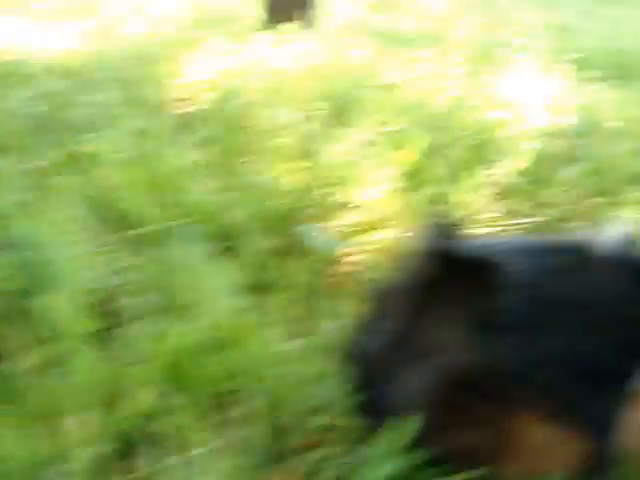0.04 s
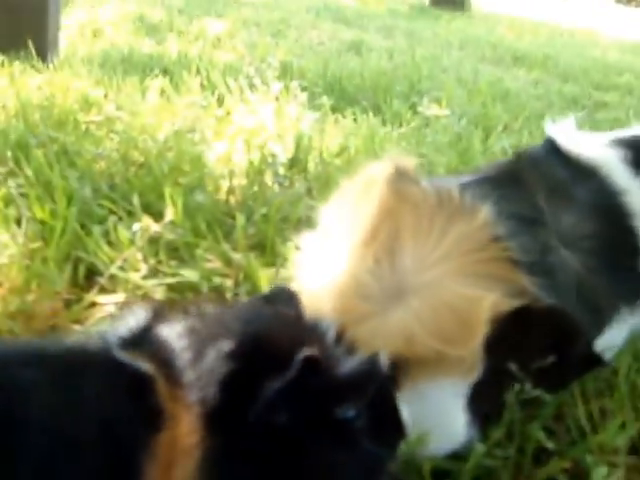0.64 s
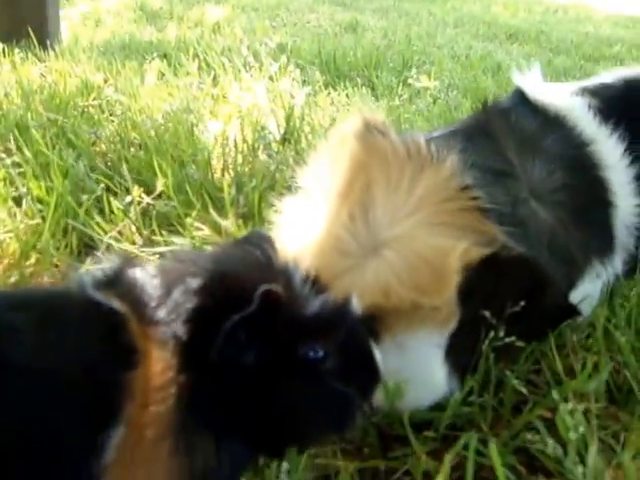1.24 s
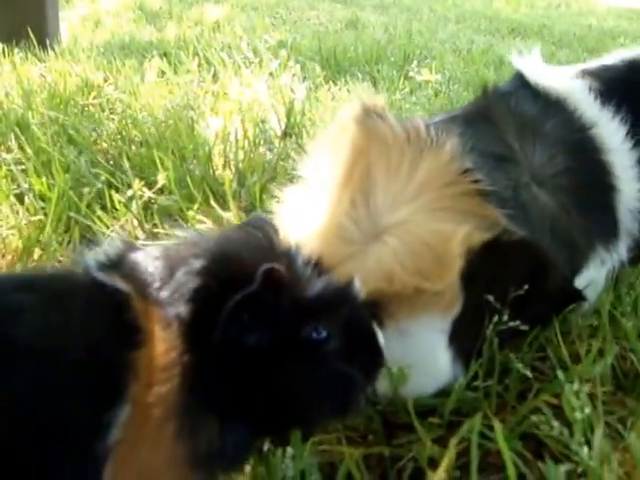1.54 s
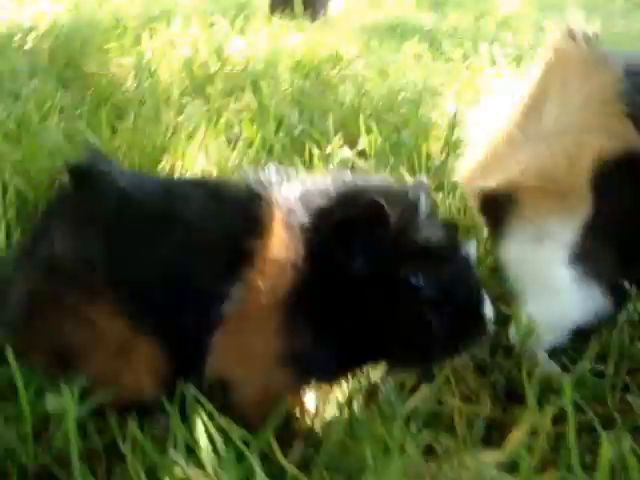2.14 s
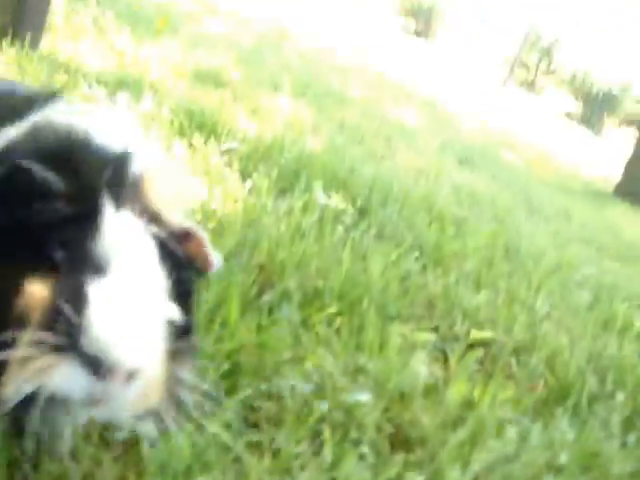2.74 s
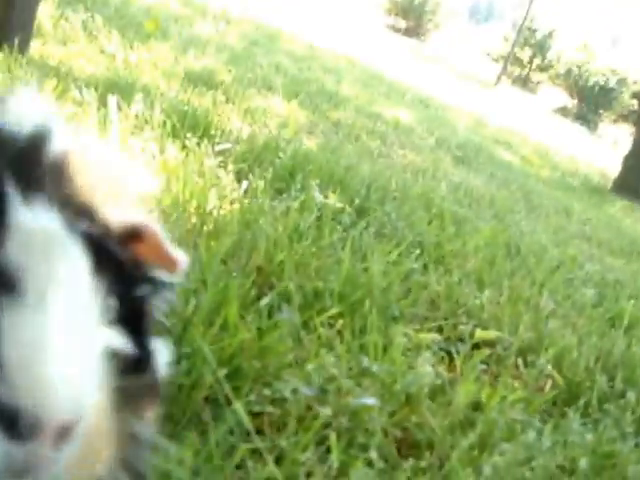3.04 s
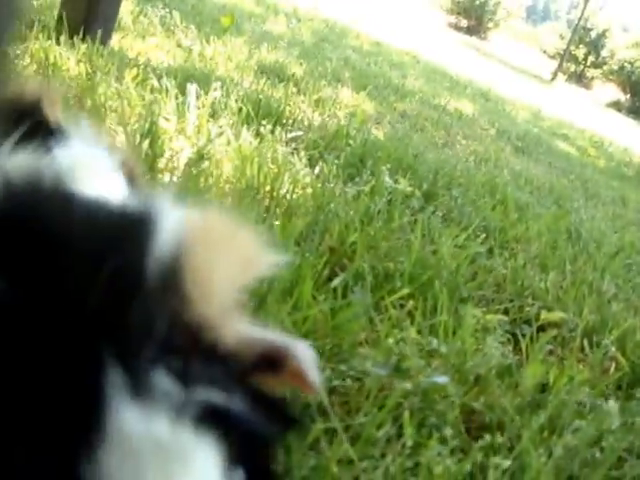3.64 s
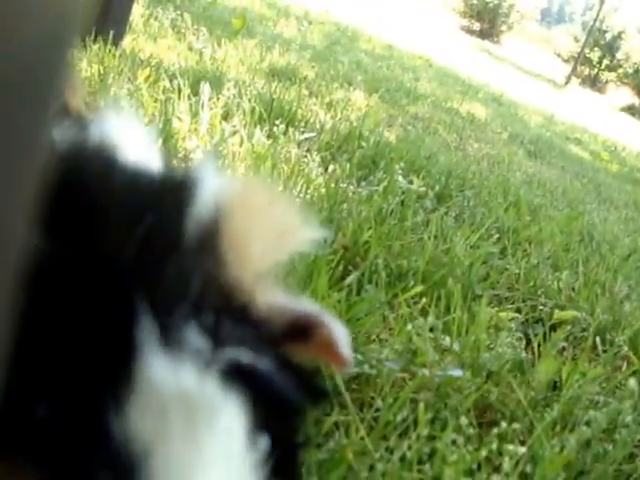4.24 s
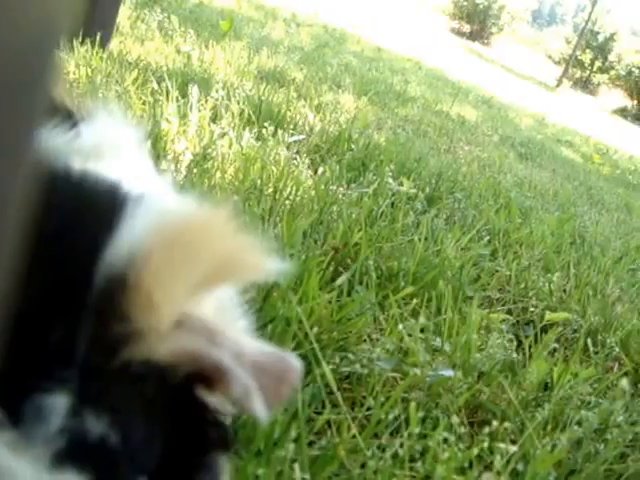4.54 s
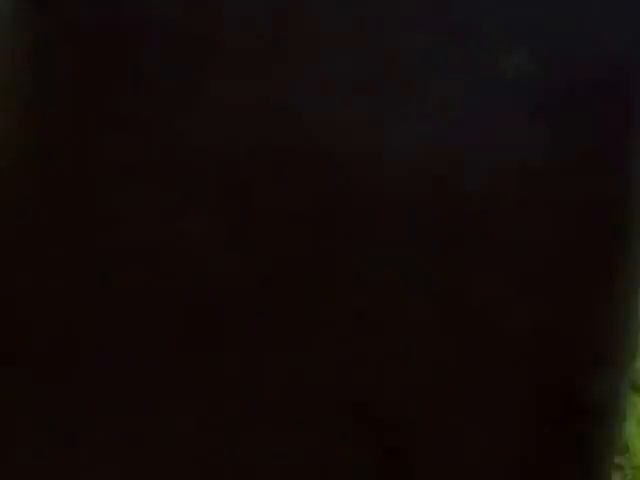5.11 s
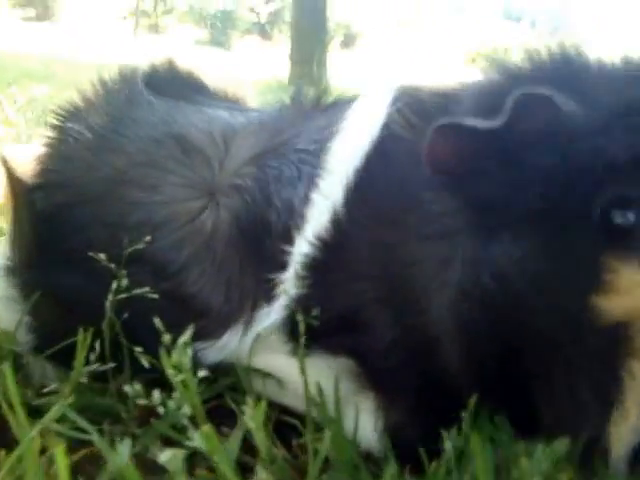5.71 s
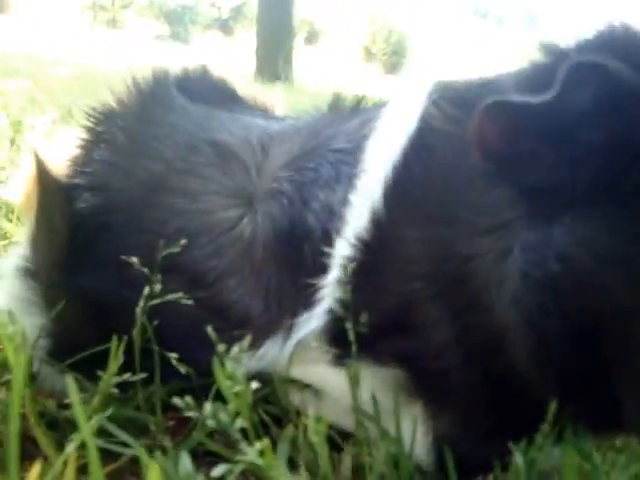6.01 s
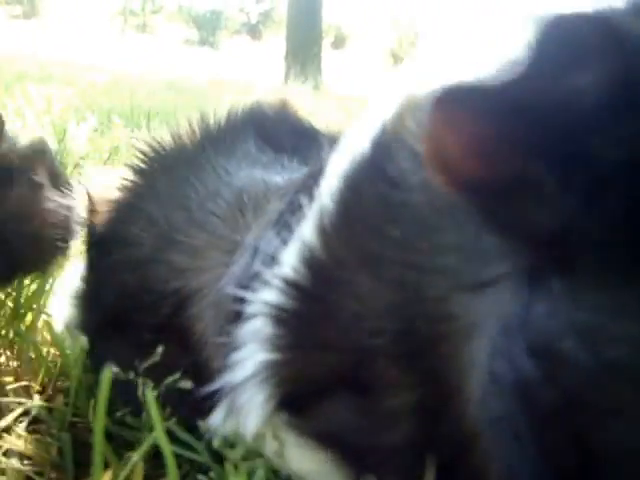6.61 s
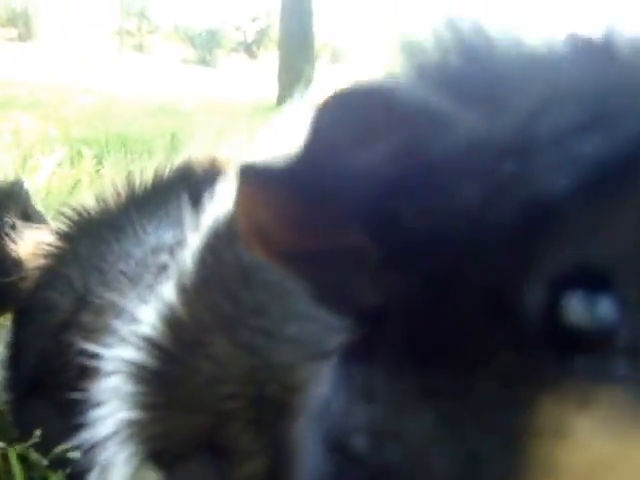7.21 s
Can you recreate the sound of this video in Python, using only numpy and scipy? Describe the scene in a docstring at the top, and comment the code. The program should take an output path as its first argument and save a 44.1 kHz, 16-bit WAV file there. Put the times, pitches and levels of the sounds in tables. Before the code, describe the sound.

Faint ticks and snaps of guinea pigs grazing on a quiet lawn, with plastic handling creaks, two knocks and distant birds.

```python
"""On a quiet lawn, guinea pigs graze around a small hand-held camera down in the grass.
Blades fracture with a snap, tick between small teeth and swish as fur brushes past. The camera's
plastic case creaks in the grip by stick-slip friction, and two knocks excite its normal modes.
Songbirds whistle further off, over faint outdoor air and the hiss of the microphone;
the treble flickers, and a faint hum enters about halfway."""
import sys
import numpy as np
from scipy import signal
from scipy.fft import rfft, irfft
from scipy.io import wavfile

SR = 44100
rng = np.random.default_rng(int(sys.argv[2]) if len(sys.argv) > 2 else 0)


def dump(signal):
    """Clip the signal to [-1, 1] and save it as 16-bit WAV at the path in sys.argv[1]."""
    limited = np.clip(np.atleast_2d(signal).T, -1, 1)
    pcm = np.round(limited * 32767).astype(np.int16)
    wavfile.write(sys.argv[1], SR, pcm)


N = 320166

# spectrum of outdoor air and microphone hiss: f/Hz, relative spectral level/dB
AIR_SPECTRUM = [(18, -41), (30, -15), (85, -11.5), (237, -3.5), (435, -1), (479, -0.5), (568, -2.5),
                (970, -3), (1700, -7), (2760, -7), (3040, -7.5), (3270, -6.5), (5450, -7.5), (8640, -10),
                (10000, -13.5), (13000, -61), (22000, -120)]
# fingers sliding on the case: t/s, duration/s, centre f/Hz, quality factor Q, level/dB
FINGER_RUBS = [(0, 1, 79.5, 0.77, -76), (2.48, 0.29, 1200, 1.4, -58.5), (2.57, .14, 108, 1.5, -54)]
# a bird's falling slurs: t/s, fall time/s, top f/Hz, bottom f/Hz, level/dB, held note/dB re the fall
BIRD_SLURS = [(0.044, 0.061, 3480, 3000, -60.5, -2), (3.003, 0.066, 3550, 2810, -65, -8),
              (5.765, .085, 4140, 3480, -56.5, -3), (5.978, 0.025, 4200, 3090, -55.5, -12),
              (6.119, 0.027, 4200, 2950, -54.5, -14), (6.463, .072, 3760, 3160, -53, -22),
              (6.737, 0.046, 3760, 3010, -54.5, -4)]
# whistled notes of level pitch: t/s, f/Hz, level/dB
BIRD_NOTES = [(1.15, 4160, -64), (5.235, 3060, -63.5), (5.474, 3250, -63), (5.535, 2462, -60.5),
              (5.642, 2767, -62.5), (6.284, 4040, -62.5), (7.035, 4280, -65)]
# soft impacts of the hand on the camera: t/s, level/dB
HAND_THUMPS = [(.048, -45), (.561, -44.5), (1.182, -43.5), (1.487, -42), (1.625, -45.5), (2.396, -45.5),
               (2.623, -33.5), (2.766, -40)]
# grass blades breaking in two stages, and two-stage clicks just after the first knock at 3.76 s: t/s, level/dB,
# centre f/Hz, delay of the second break/s
BLADE_SNAPS = [(.186, -39, 4700, .002), (2.319, -35, 2080, 0.0059), (2.7571, -24.5, 5300, 0.0032),
               (3.7687, -23.5, 6800, 0.0041), (3.7906, -36.5, 7000, .0027), (5.945, -43.5, 8500, 0.0016),
               (6.84, -33, 5040, 0.0029), (7.0072, -41.5, 3500, 0.0017)]
# stick-slip creaks: t/s, duration/s, slip rate f/Hz, level/dB, step per harmonic/dB, roughness (0-1),
# delay of the closing slip/s, closing slip/dB re the main run
CASE_CREAKS = [(0.702, 0.011, 620, -47.5, -16, 0.65, 0.028, -3.5),
               (2.015, .0065, 640, -45.5, -20, 0.2, 0.026, -1.5),
               (2.102, 0.011, 1045, -42.5, -15, .06, .023, -6.5),
               (2.857, 0.029, 467, -42.5, -7, 0.2, 0.033, -3.5),
               (3.218, .0155, 944, -35.3, -6.5, 0.3, .0245, -5),
               (3.5764, 0.012, 980, -32, -6.5, 0.27, .016, -.5),
               (4.327, .011, 743, -46.5, -10, 0.6, 0.029, -6), (4.558, .022, 760, -53, -10, .42, 0.032, 0),
               (4.632, 0.034, 1074, -53.5, -22, 0.37, 0.051, 1.5),
               (4.723, 0.03, 1140, -53, -19, 0.56, .041, 1), (4.927, .05, 1052, -54, -6, 0.6, .063, 3),
               (5.064, 0.034, 904, -53.5, -13, .35, .029, -12),
               (6.107, .025, 657, -42, -11.5, 0.17, .044, -5),
               (6.114, .02, 990, -40.5, -29, 0.09, .036, -4),
               (6.713, .034, 752, -51.5, -4.5, 0.55, 0.049, -3),
               (6.885, .03, 820, -45, -12, 0.68, 0.049, -8)]
# grass and fur brushing past: peak t/s, duration/s, level/dB, centre f/Hz
GRASS_SWISHES = [(2.149, 0.18, -59, 3750), (2.344, .05, -49.5, 2190), (2.351, 0.071, -48, 6760),
                 (2.807, 0.075, -54.5, 7000), (3.299, .062, -50.5, 6900), (6.284, 0.045, -46, 7000),
                 (6.637, 0.14, -52.5, 6760)]
# light taps of a loose plastic part: t/s, level/dB, f/Hz, T60/s
PLASTIC_TAPS = [(2.759, -21, 630, 0.012), (4.4496, -28.5, 1150, 0.0085), (4.4545, -31.5, 1340, 0.0036),
                (4.8832, -33.5, 1110, 0.0067), (4.8993, -38, 1280, 0.0077), (6.8429, -31, 584, 0.019),
                (7.0076, -26, 1130, 0.0027)]
# blows on the case: t/s, level/dB
CASE_KNOCKS = [(3.7632, -18), (3.7903, -43), (4.0636, -20.5)]
# normal modes of the case: f/Hz, relative level/dB, T60/s
CASE_MODES = [(183, -31, 0.25), (263, -2, 0.055), (328, -14.5, 0.11), (439, -7, 0.039), (580, 2, 0.047),
              (810, -17, 0.055), (1155, -10, 0.033), (1335, -10.5, 0.029), (2000, -1.5, 0.0086),
              (2640, -14, 0.019)]


def undb(db):
    """Amplitude ratio for a level in decibels."""
    return 10 ** (np.asarray(db) / 20)


def unit(x):
    """Normalisation to an rms of 1."""
    return x / np.sqrt(np.mean(x ** 2) + 1e-20)


def clock(length):
    """Uniform sample times of a short sound."""
    return np.arange(max(int(length * SR), 8)) / SR


def add(track, start, sound):
    """Superposition of a sound on the track from its start time."""
    i = max(int(start * SR), 0)
    part = sound[:max(N - i, 0)]
    track[i:i + len(part)] += part


def lowpass(x, hz, order=2):
    """Butterworth attenuation above the cutoff."""
    return signal.sosfilt(signal.butter(order, hz, fs=SR, output="sos"), x)


def highpass(x, hz, order=2):
    """Butterworth attenuation below the cutoff."""
    return signal.sosfilt(signal.butter(order, hz, "high", fs=SR, output="sos"), x)


def band(x, hz, q):
    """Second-order resonance with unit gain at its centre."""
    return signal.lfilter(*signal.iirpeak(hz, q, fs=SR), x)


def walk(rate, size):
    """Random modulation: linear interpolation between Gaussian values, rate of them a second."""
    steps = np.arange(size) * rate / SR
    knots = rng.standard_normal(int(steps[-1]) + 2)
    return np.interp(steps, np.arange(len(knots)), knots)


def decay(t, t60):
    """Exponential damping by 60 dB in t60 seconds."""
    return np.exp(-np.log(1000) * t / t60)


def ring(t, hz, t60):
    """Free vibration of a damped mode after an impulse."""
    return np.cos(2 * np.pi * hz * t) * decay(t, t60)


def air(db=-56, swell_db=0.7, flicker_db=1.5, split_hz=1500):
    """Broadband noise: the low band of distant air fluctuates under stationary microphone hiss."""
    hz, spectrum_db = np.transpose(AIR_SPECTRUM)
    freqs = np.maximum(np.arange(N // 2 + 1) * SR / N, 1)
    colour = undb(np.interp(np.log(freqs), np.log(hz), spectrum_db))
    noise = unit(irfft(rfft(rng.standard_normal(N)) * colour, N))
    outdoors = irfft(rfft(noise) / (1 + (freqs / split_hz) ** 2), N)
    hiss = noise - outdoors
    swell = undb(swell_db * walk(1.77, N) + flicker_db * walk(14, N))
    return undb(db) * (hiss + outdoors * swell)


def treble_flicker(db=-70, hz=6000, flicker_db=9.5, flicker_hz=24):
    """Amplitude-modulated noise: a faint, quickly flickering high hiss."""
    hiss = band(rng.standard_normal(N), hz, q=0.9)
    flicker = undb(flicker_db * np.tanh(walk(flicker_hz, N)))
    return undb(db) * unit(hiss * flicker)


def rubs():
    """Sliding friction: a finger on the case drives one broad resonance with a swell of noise."""
    out = np.zeros(N)
    for start, length, hz, q, db in FINGER_RUBS:
        t = clock(length)
        friction = unit(band(band(rng.standard_normal(len(t)), hz, q), hz, q))
        add(out, start, undb(db) * friction * np.sin(np.pi * t / length))
    return out


def whistle(length, first_hz, last_hz, waver=0.0099, flutter_db=4.2, bend_power=1.43):
    """Frequency and amplitude modulation: a fluttering tone bends ever faster toward its last pitch."""
    t = clock(length)
    glide_hz = first_hz + (last_hz - first_hz) * (t / length) ** bend_power
    hz = glide_hz * (1 + waver * walk(390, len(t)))
    swell = np.sin(np.pi * t / length) * undb(flutter_db * walk(105, len(t)))
    return unit(swell * np.sin(2 * np.pi * np.cumsum(hz) / SR))


def birds(hold_s=0.07, note_s=0.063, echo_db=-8, echo_t60=0.59):
    """Reverberation: trees scatter a thin echo of falling slurs, level notes and one trill."""
    song = np.zeros(N)
    for start, fall, top_hz, bottom_hz, db, hold_db in BIRD_SLURS:
        add(song, start, undb(db) * whistle(fall, top_hz, bottom_hz, waver=0.023))
        add(song, start + fall, undb(db + hold_db) * whistle(hold_s, bottom_hz, bottom_hz))
    for start, hz, db in BIRD_NOTES:
        add(song, start, undb(db) * whistle(note_s, hz, hz))
    add(song, 4.712, trill())
    t = clock(0.5)
    trees = rng.standard_normal(len(t)) * decay(t, echo_t60)
    echo = signal.fftconvolve(song, trees / np.linalg.norm(trees))[:N]
    return song + undb(echo_db) * echo


def thumps(hz=120, t60=0.032, rise_s=0.0019, soft_hz=230):
    """Heavy damping: the shifting hand sets off a low vibration that lasts only a few cycles."""
    out, t = np.zeros(N), clock(0.12)
    thump = ring(t, hz, t60) * (1 - np.exp(-t / rise_s))
    for start, db in HAND_THUMPS:
        add(out, start, undb(db) * thump)
    return lowpass(out, soft_hz)


def nibbling(db=-52, spread_db=-12, hz=4500, decay_s=0.0015, count=45):
    """Random impulses: small teeth crop the grass in faint ticks of uneven strength."""
    out, t = np.zeros(N), clock(0.01)
    for when, softness in rng.random((count, 2)):
        tick = unit(band(rng.standard_normal(len(t)), hz, q=1)) * np.exp(-t / decay_s)
        add(out, when * N / SR, undb(db + spread_db * softness) * tick)
    return out


def snaps(q=1.07, lead_s=0.0046, decay_s=0.00081, rise_ratio=0.56, second_db=-3):
    """Fracture: a blade tears fibre by fibre up to its break, and the remainder parts just after; sharp clicks
    with the same two stages follow the first knock."""
    out, t = np.zeros(N), clock(0.025) - lead_s
    for start, db, hz, delay in BLADE_SNAPS:
        first, second = (np.exp(-np.maximum(age, -age / rise_ratio) / decay_s) for age in (t, t - delay))
        envelope = first + undb(second_db) * second
        tearing = rng.standard_normal(len(t)) * envelope
        fibres = band(band(tearing, hz, q), hz, q / 2)
        fibres *= np.linalg.norm(envelope) / np.linalg.norm(fibres)
        add(out, start - lead_s, undb(db) * fibres)
    return out


def slip_run(length, hz, step_db, rough, jitter=0.4, flutter=0.9, edge_s=0.00029, ease_db=-4):
    """Relaxation oscillation: four harmonics, uneven with roughness, weaken as strain is released."""
    t = clock(length)
    slip_hz = hz * np.exp(jitter * rough * walk(hz, len(t)))
    phase = 2 * np.pi * np.cumsum(slip_hz) / SR
    slips = sum(undb(step_db * k) * np.cos((k + 1) * (phase + np.pi / 2)) for k in range(4))
    edges = np.clip(np.minimum(t, (length - t) / 2) / edge_s, 0, 1)
    grip = edges * undb(ease_db * t / length)
    unevenness = np.exp(flutter * rough * walk(hz, len(t)))
    return -unit(slips * grip * unevenness)


def creaks(closing_ratio=1.255, closing_cycles=5.5, closing_step_db=-3, top_hz=3200, bass_hz=340):
    """Stick-slip friction: plastic slips in a short run, catches, then settles in a quicker, purer one."""
    out = np.zeros(N)
    for start, length, hz, db, step_db, rough, delay, closing_db in CASE_CREAKS:
        add(out, start, undb(db) * slip_run(length, hz, step_db, rough))
        quick_hz = closing_ratio * hz
        closing = slip_run(closing_cycles / quick_hz, quick_hz, step_db + closing_step_db, rough=0.17)
        add(out, start + delay, undb(db + closing_db) * closing)
    return highpass(lowpass(out, top_hz, order=4), bass_hz)


def swishes(grain_db=3, rustle_ratio=5.5, rustle_db=-12):
    """Friction noise: brushed blades give a grainy swell, their neighbours a longer, fainter rustle."""
    out = np.zeros(N)
    for peak, length, db, hz in GRASS_SWISHES:
        for span, level_db in (length, db), (rustle_ratio * length, db + rustle_db):
            t = clock(span)
            grains = rng.standard_normal(len(t)) * undb(grain_db * walk(900, len(t)))
            swish = unit(band(grains, hz, q=1)) * np.sin(np.pi * t / span)
            add(out, peak - span / 2, undb(level_db) * swish)
    return out


def taps(upper_ratio=1.57, upper_db=-11):
    """Inharmonic vibration: a loose plastic part taps and rings briefly in two modes."""
    out, t = np.zeros(N), clock(0.12)
    for start, db, hz, t60 in PLASTIC_TAPS:
        upper = undb(upper_db) * ring(t, upper_ratio * hz, t60 / 2)
        add(out, start, undb(db) * (ring(t, hz, t60) + upper))
    return out


def knocks(rattle_db=-20, rattle_t60=0.05, rattle_hz=900):
    """Impulse response: blunt blows excite the modes of the whole case and shake its loose parts."""
    out, t = np.zeros(N), clock(0.12)
    case = sum(undb(db) * ring(t, hz, t60) for hz, db, t60 in CASE_MODES)
    for start, db in CASE_KNOCKS:
        rattle = unit(lowpass(rng.standard_normal(len(t)), rattle_hz)) * decay(t, rattle_t60)
        add(out, start, undb(db) * (case + undb(rattle_db) * rattle))
    return out


def hum(hz=175, q=18, db=-73):
    """Narrow-band noise, heard as a faint wavering hum, enters about halfway."""
    fade = np.interp(np.arange(N) / SR, [4.1, 4.4, 5.4, 7.2], [0, 0.69, 0.62, 0.4])
    return undb(db) * fade * unit(band(band(rng.standard_normal(N), hz, q), hz, q))


def trill(length=0.18, sweep_rate=43, low_hz=3740, high_hz=5130, hoarseness=0.099, db=-59.5):
    """Sawtooth frequency modulation: a bird sings a fast run of hoarse upward sweeps."""
    t = clock(length)
    sweep_hz = low_hz + (high_hz - low_hz) * (t * sweep_rate % 1)
    hz = sweep_hz * (1 + hoarseness * walk(900, len(t)))
    swell = np.sqrt(np.sin(np.pi * t / length))
    return undb(db) * unit(swell * np.sin(2 * np.pi * np.cumsum(hz) / SR))


def scene():
    """Superposition: the pressures of all sources add at one microphone."""
    impacts = highpass(lowpass(taps() + knocks(), hz=3200, order=6), hz=190)
    handling = rubs() + thumps() + creaks() + impacts
    high_hiss = treble_flicker()
    grazing = nibbling() + snaps() + swishes()
    return (air() + high_hiss + handling + birds() + grazing + hum())[None]


def record(dry):
    """Band limiting: the small camera loses the deep bass and cuts the top steeply."""
    bass_hz, top_hz = 28, 10050
    treble_cut = signal.ellip(12, 0.2, 70, top_hz, fs=SR, output="sos")
    return signal.sosfilt(treble_cut, highpass(dry, bass_hz, order=1))


dry = scene()
out = record(dry)
dump(out)
```